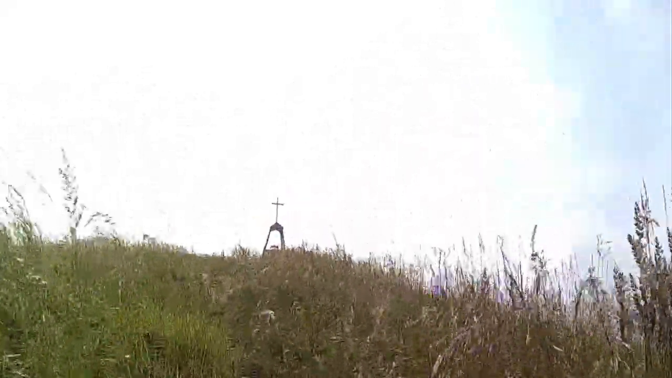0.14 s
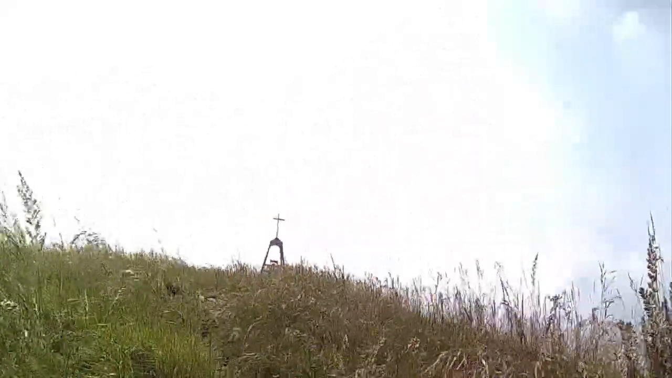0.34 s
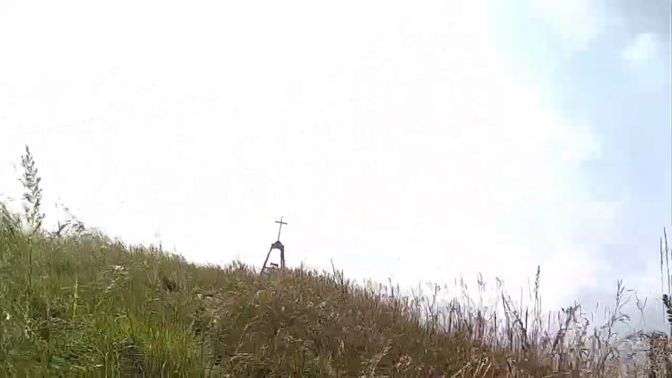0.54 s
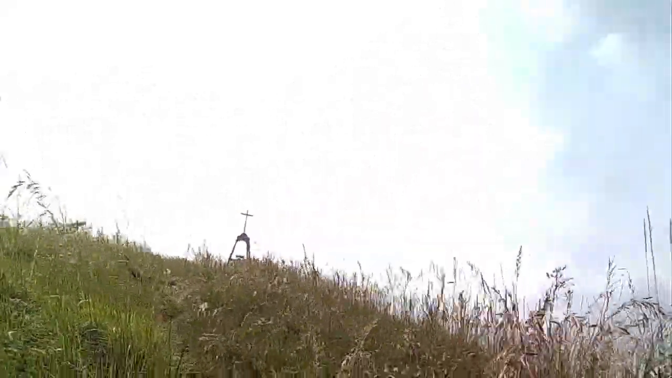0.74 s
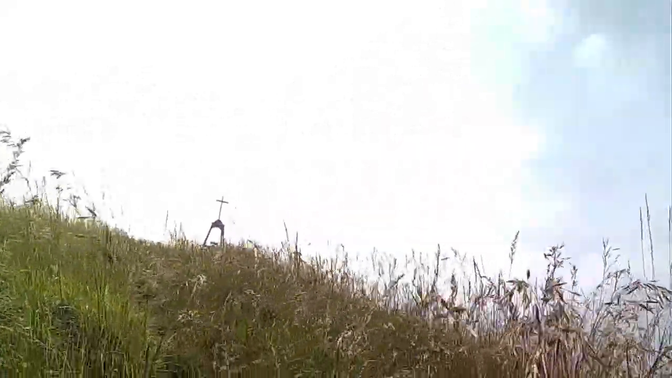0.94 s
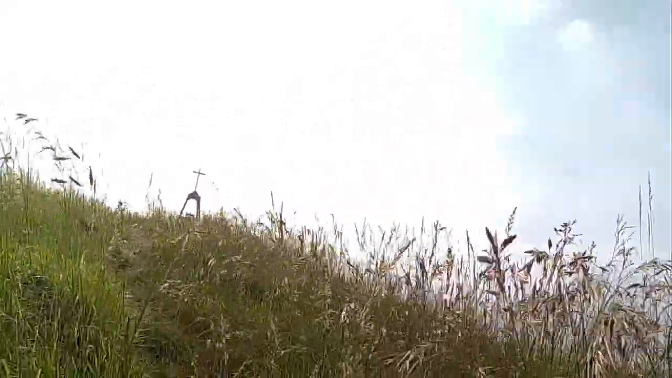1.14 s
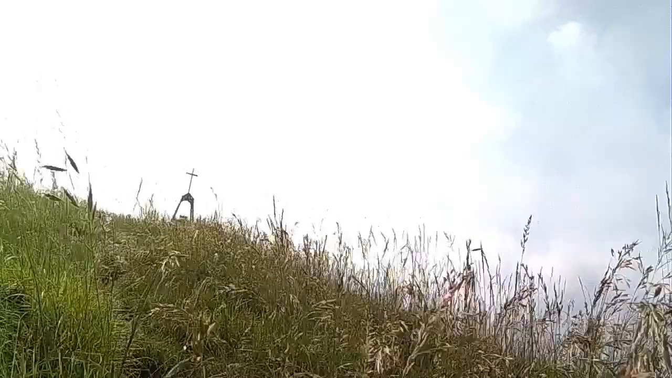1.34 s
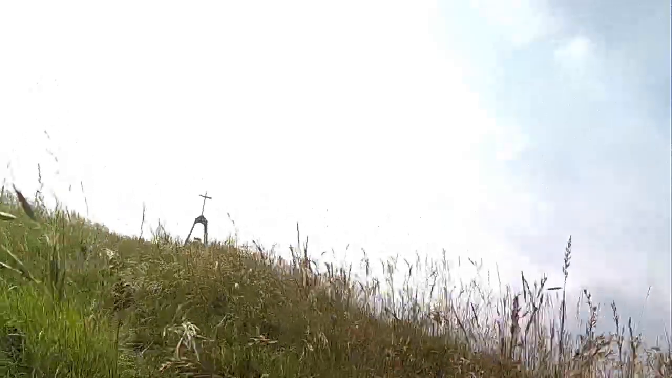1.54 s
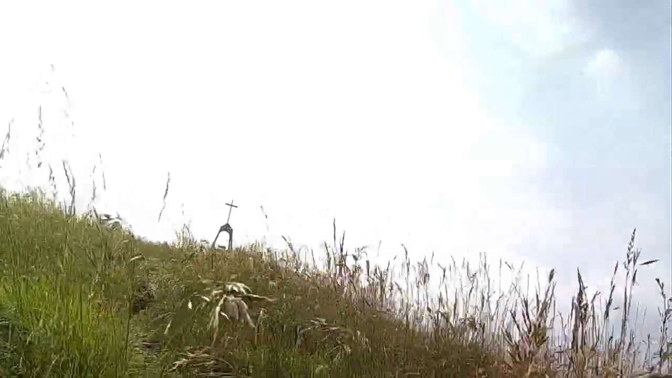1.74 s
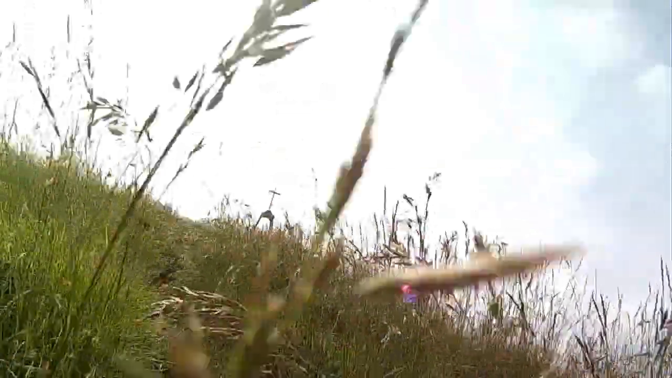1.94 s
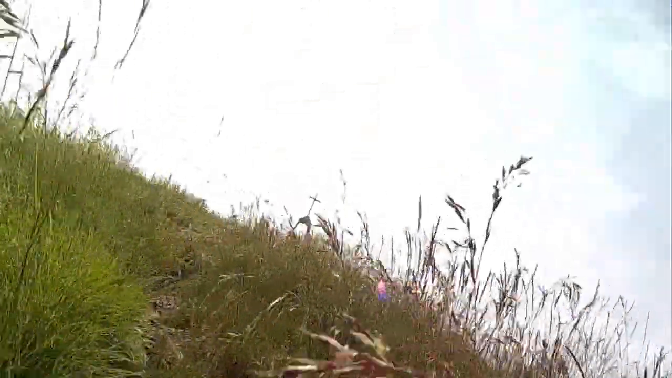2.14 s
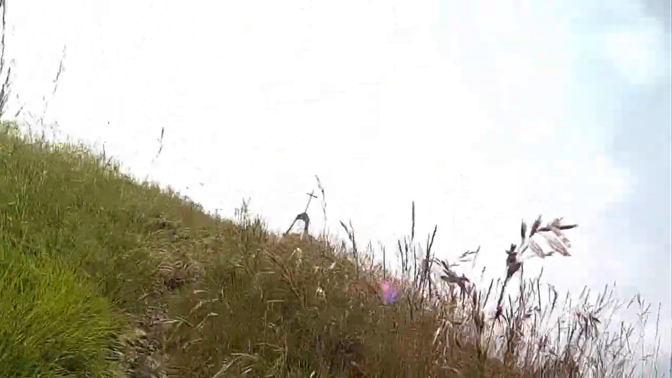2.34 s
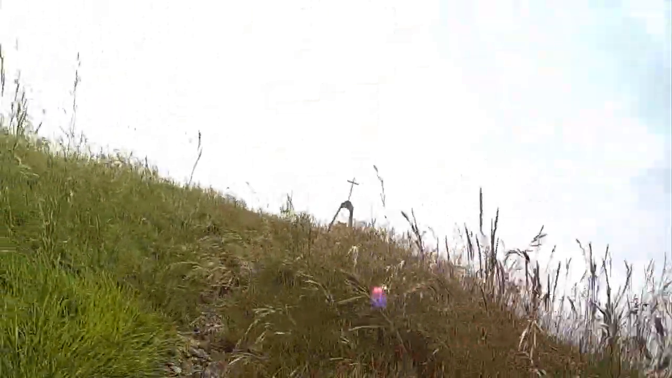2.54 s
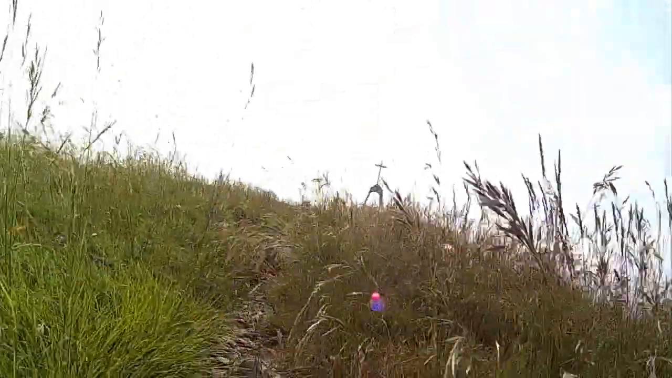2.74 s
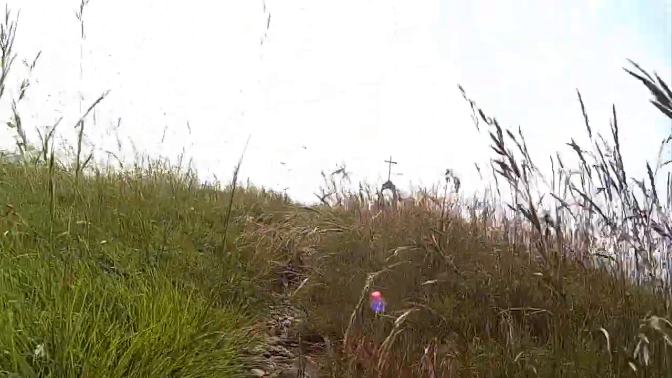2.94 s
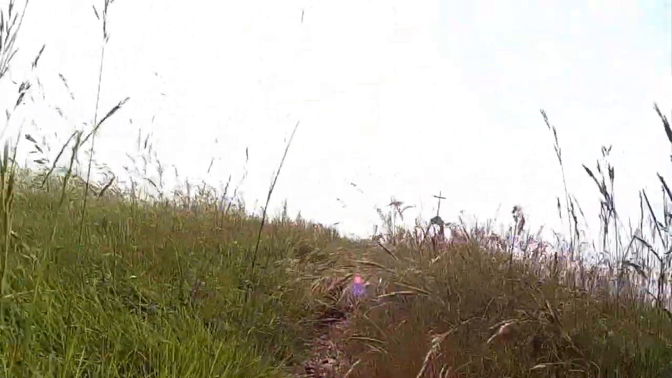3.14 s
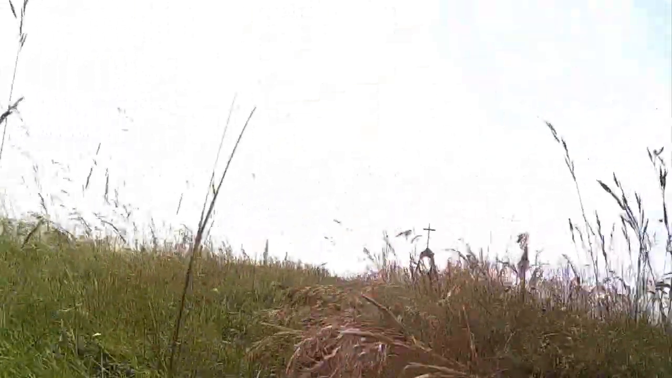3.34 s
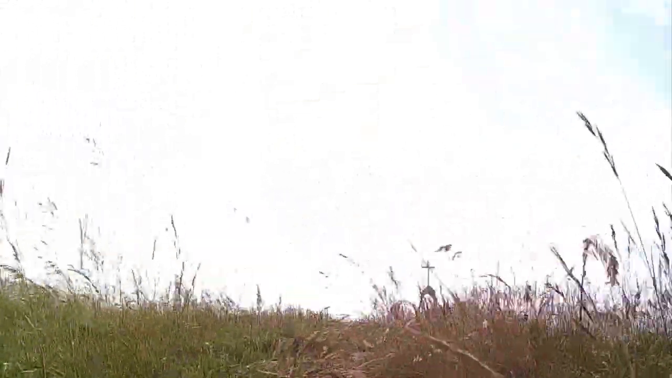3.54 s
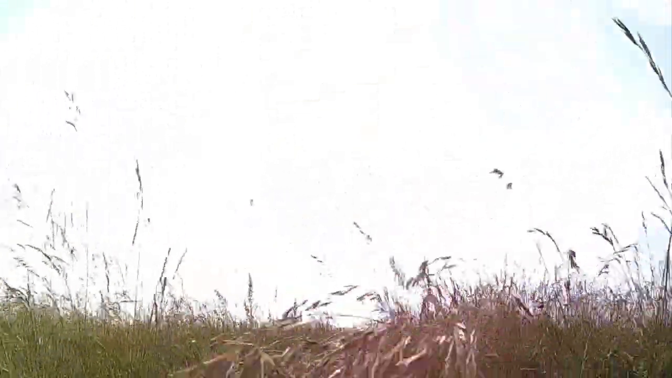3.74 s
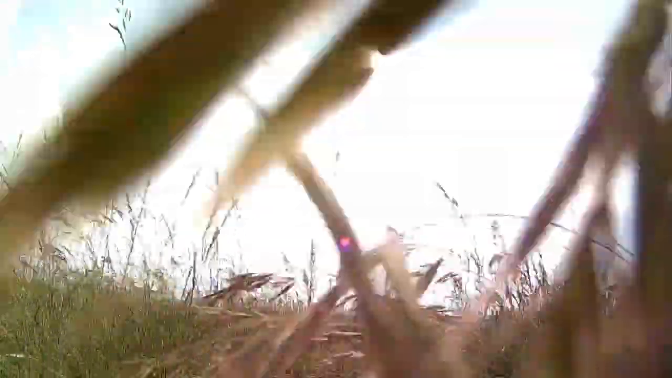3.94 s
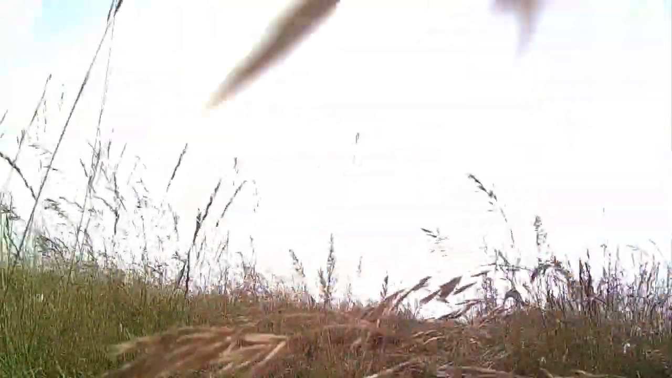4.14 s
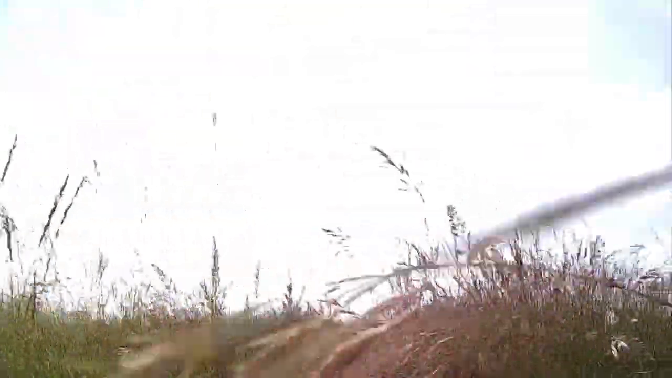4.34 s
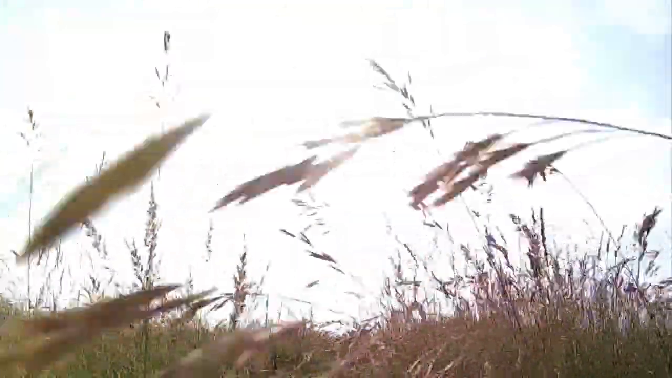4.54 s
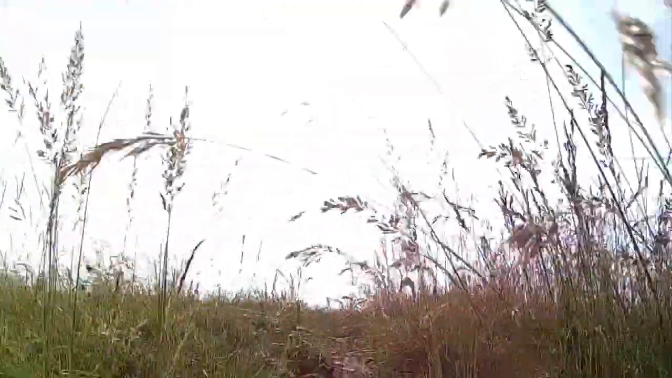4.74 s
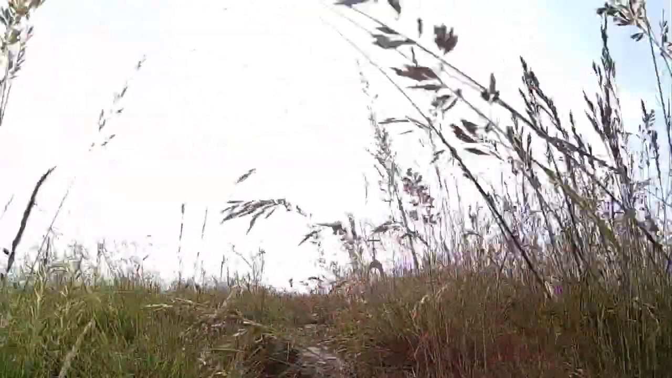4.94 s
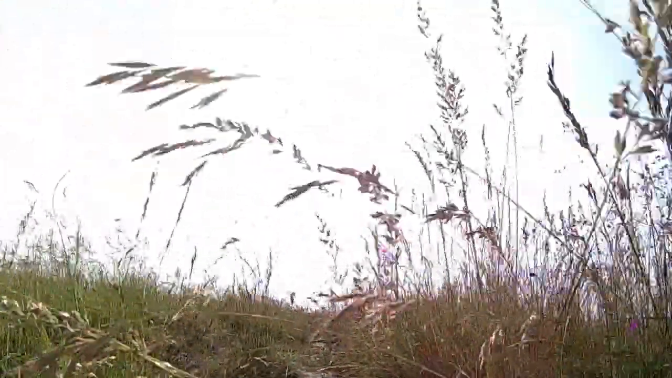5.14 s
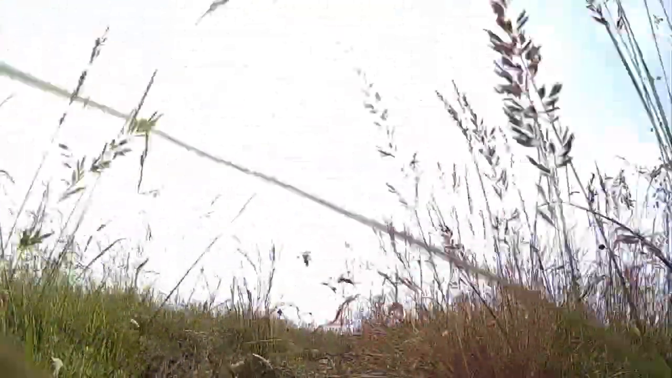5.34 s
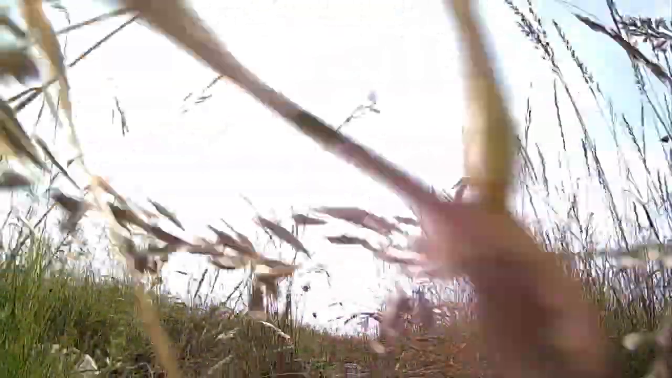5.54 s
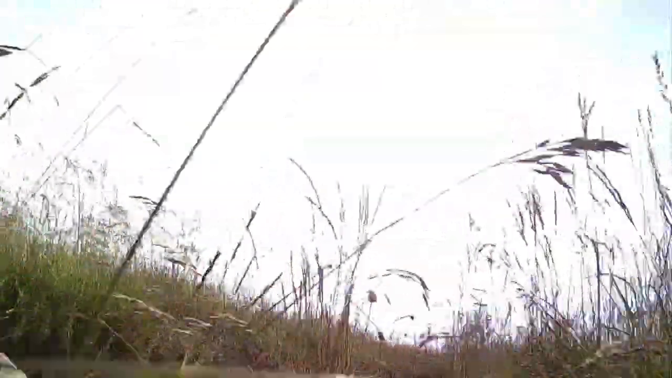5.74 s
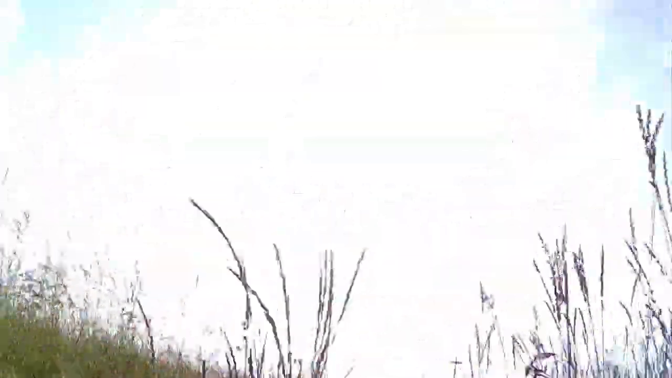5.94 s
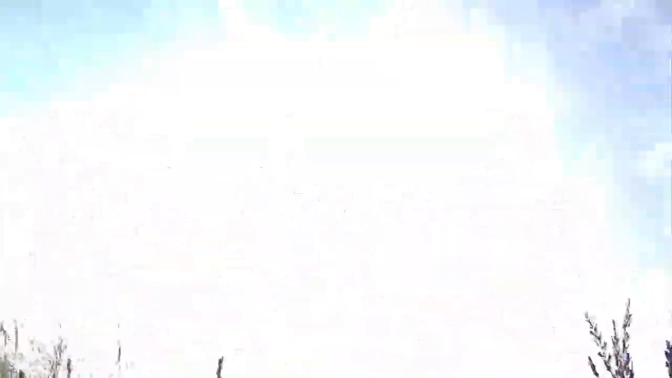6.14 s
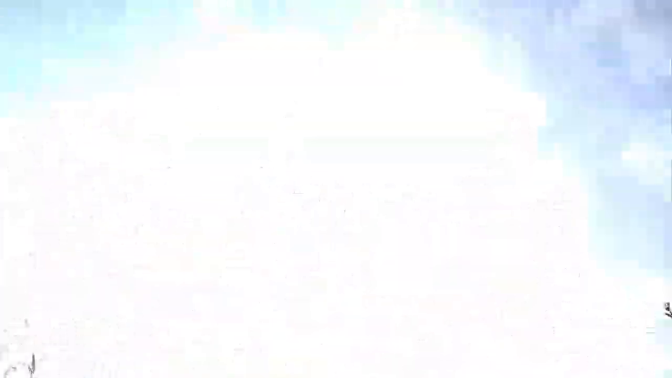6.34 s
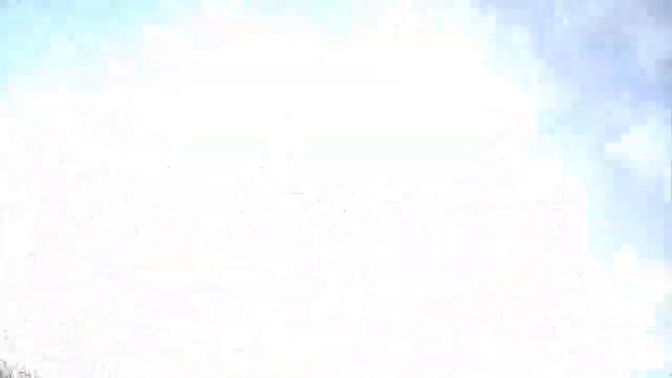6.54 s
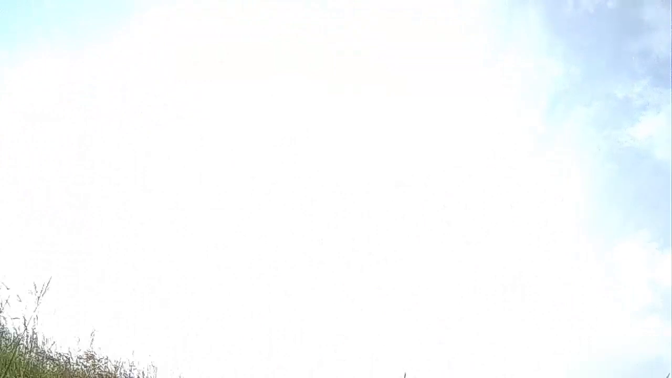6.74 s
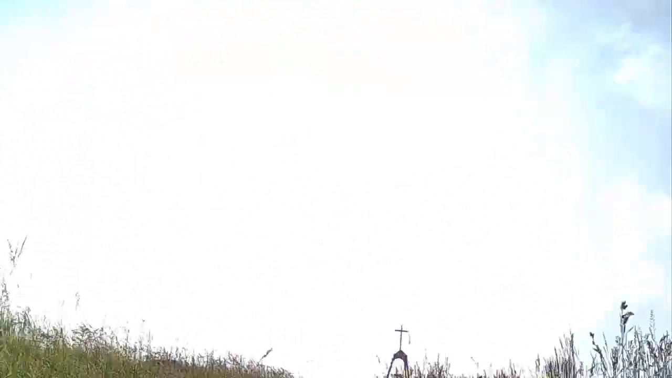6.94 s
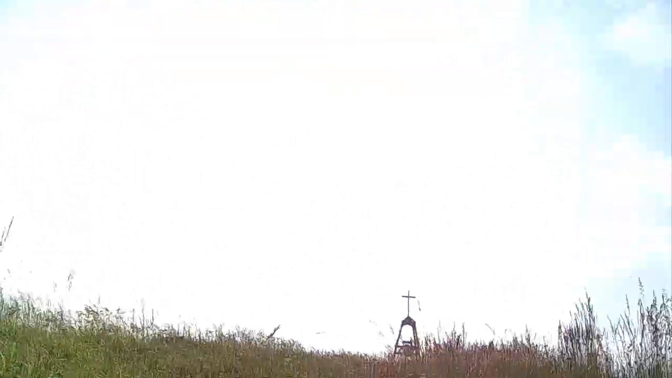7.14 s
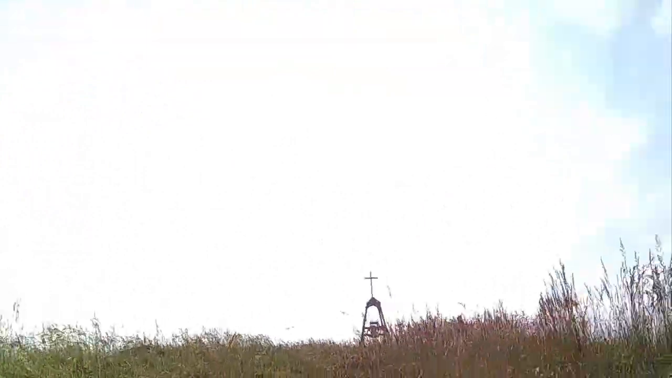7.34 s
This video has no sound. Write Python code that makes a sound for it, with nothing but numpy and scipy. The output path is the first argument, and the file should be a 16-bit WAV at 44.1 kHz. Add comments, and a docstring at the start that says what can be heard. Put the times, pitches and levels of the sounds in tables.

```python
"""Small camera through tall dry grass

Stalks and seed heads rub, tick and scrape on the plastic housing of a camera carried low, ringing its
short modes, and heavy stems thump the body. Air moving past the port rumbles and flutters.
Underneath, the electronics hiss, whine and blip faintly."""
import sys
import numpy as np
from scipy.fft import rfft, irfft, next_fast_len
from scipy.io import wavfile
from scipy.ndimage import map_coordinates

SR = 44100
rng = np.random.default_rng(int(sys.argv[2]) if len(sys.argv) > 2 else 0)


def int16_out(signal):
    """Quantize to a 16-bit WAV file."""
    q = np.round(np.clip(np.atleast_2d(signal).T, -1, 1) * 32767)
    wavfile.write(sys.argv[1], SR, q.astype(np.int16))


N = 325899

# resonances of the plastic housing: pitch_hz, width_hz, level_db
HOUSING_MODES = [(333, 40, -15.5), (549, 153, -15), (833, 134, -8.5), (1223, 112, 1.5), (1539, 179, 0.5),
                 (1872, 263, -7.5), (2005, 410, -7), (2340, 1460, -10.5), (3167, 170, -8),
                 (3682, 238, -9.5), (4107, 237, -6.5), (4770, 214, -9.5), (5530, 370, -14),
                 (6520, 2540, -14.5), (7760, 700, -9.5), (7990, 570, -18.5), (9880, 560, -16),
                 (11200, 3300, -32.5), (14600, 1100, -33.5)]
# heavy stems jolting the body: start_s, peak_db, pitch_hz, t60_s, direction
STEM_HITS = [(2.33, -23, 163, 0.023, 1), (3.11, -11, 54.57, 0.2, -1), (3.268, -25, 518, 0.037, 1),
             (3.31, -16, 94.1, 0.028, -1), (3.536, -21, 168, 0.075, 1), (3.737, -18, 67, 0.088, 1),
             (3.788, -16.5, 105.2, 0.052, 1), (4.011, -20, 61.3, 0.34, -1), (4.064, -24, 136, 0.04, -1),
             (4.295, -10, 63, 0.039, 1), (4.315, -18, 182.3, 0.18, -1), (4.361, -9.5, 129, 0.029, -1),
             (4.386, -26, 50.6, 0.062, 1), (4.819, -34, 49, 0.13, 1), (5.079, -21, 382, 0.035, 1),
             (5.326, -18, 137, 0.023, -1), (5.349, -23.5, 46.38, 0.11, 1), (6.353, -17.5, 207, 0.013, 1)]
SPLIT_HZ = 2000  # soft contacts ring the modes below, hard ones those above


def amp(db):
    return 10 ** (np.asarray(db) / 20)


def unit_rms(x):
    return x / np.sqrt(np.mean(x ** 2, axis=-1, keepdims=True) + 1e-20)


def fader(points):
    """Gain per sample through (time_s, level_db) points; silent outside them."""
    time_s, level_db = np.transpose(points)
    return amp(np.interp(np.arange(N) / SR, time_s, level_db, -120, -120))


def wobble(rate):
    """A smooth random curve, rate knots a second."""
    return map_coordinates(rng.standard_normal(int(N * rate / SR) + 4), [np.arange(N) * rate / SR])


def filtered(x, response):
    """Passes x through a complex frequency response."""
    n = x.shape[-1]
    padded = next_fast_len(n + 4096)
    return irfft(rfft(x, padded) * response(np.fft.rfftfreq(padded, 1 / SR)), padded)[..., :n]


def noise(spectrum):
    """Noise of rms 1 coloured by (frequency_hz, level_db) points."""
    hz, db = np.transpose(spectrum)
    colour = lambda f: amp(np.interp(np.log(f + 1), np.log(hz + 1), db, -120, -120))
    return unit_rms(filtered(rng.standard_normal(N), colour))


def lay_out(start_s, sounds):
    """A track with each sound laid at its start time."""
    track = np.zeros(N)
    for start, sound in zip(start_s, sounds):
        at = round(start * SR)
        track[at:][:len(sound)] += sound[:N - at]
    return track


def air():
    """Slow eddies rumble at the port; air, drags and thumps shake up a body flutter near 180 Hz."""
    # strength of the rumble: time_s, level_db
    gusts = [(0.0, -43.5), (0.64, -46.5), (1.48, -40.5), (1.77, -45.5), (2.3, -36.5), (2.8, -42.5),
             (4.49, -30.5), (5.06, -37), (5.43, -32), (5.68, -39), (6.05, -32), (6.57, -41.5),
             (6.85, -33.5), (7.39, -43.5)]
    # colour of the eddies: frequency_hz, density_db
    rumble_spectrum = [(12, -31.5), (22, -7.5), (41, -0.5), (58, -7), (85, -20), (130, -33), (200, -53)]
    # colour of the shaking body: frequency_hz, density_db
    flutter_spectrum = [(70, -30), (100, -4), (150, -0.5), (183, 3), (220, -2.5), (290, -17.5),
                        (345, -13.5), (430, -29.5), (600, -63)]
    air_send_db, drag_send_db, thump_send_db = -16, -11, -19.5  # into the flutter
    linger = 2.64  # flutter decay time over the thump's
    t = np.arange(N) / SR
    airflow = fader(gusts)
    jolts = sum((t > start) * amp(db + thump_send_db - 60 * np.abs(t - start) / (linger * t60))
                for start, db, _, t60, _ in STEM_HITS)
    shake = amp(air_send_db) * airflow + amp(drag_send_db) * drag_gains()[0] + jolts
    rumble = unit_rms(amp(0.67 * wobble(11)) * noise(rumble_spectrum))
    flutter = unit_rms(amp(2.7 * wobble(30)) * noise(flutter_spectrum))
    return airflow * rumble + shake * flutter


def electronics():
    """Preamp hiss, a faint comb of tones, and a blip on two of every three frames."""
    # colour of the preamp noise: frequency_hz, density_db
    hiss_spectrum = [(120, -35), (200, -4.5), (485, -6), (943, -9.5), (1200, -10.5), (1440, -12.5),
                     (3430, -15), (4530, -15), (4970, -16.5), (15300, -22.5), (16500, -36)]
    # tones of the whine: pitch_hz, rms_db
    whine_tones = [(9830, -91), (9906, -92), (9982, -86), (10020, -84), (10058, -91)]
    # fader on the blips: time_s, level_db
    blip_levels = [(0, -56), (1, -54), (3.3, -48), (3.8, -66.5), (7.39, -85)]
    hiss_db, frames_per_s = -57, 30 / 1.001
    t = np.arange(N) / SR
    whine = sum(amp(db) * np.sqrt(2) * np.sin(2 * np.pi * (hz * t + rng.random()))
                for hz, db in whine_tones)
    frame = np.arange(int(N / SR * frames_per_s))
    dip_db = -8 * np.isin(frame % 15, [5, 6])  # the blips duck once each half second
    strength = (frame % 3 != 1) * amp(dip_db + rng.normal(0, 1.5, len(frame)))
    blip_hz = 4460 + rng.normal(0, 60, (len(frame), 1))
    age = t[:500]
    blip = np.sin(2 * np.pi * blip_hz * age) * np.exp(-((age - .004) / 0.0021) ** 2)
    blips = lay_out(frame / frames_per_s + 0.0091, strength[:, None] * blip)
    return amp(hiss_db) * noise(hiss_spectrum) + whine + fader(blip_levels) * blips


def housing(group):
    """Responses, a row each, and count of one group of housing modes (0 low, 1 high, 2 top)."""
    hz, width, db = np.transpose(HOUSING_MODES)[..., None]
    inside = np.digitize(hz[:, 0], [SPLIT_HZ, 3 * SPLIT_HZ]) == group
    gain = amp(db) * (-1) ** np.arange(len(hz))[:, None]
    soft_hz = [2600, 5500, 30000][group]  # soft stalks roll off above the group

    def response(f):
        resonances = gain * 1j * f * width / (hz ** 2 - f * f + 1j * f * width)
        return resonances[inside] / (1 + 1j * f / soft_hz) ** 3
    return response, inside.sum()


def strokes(start_s, length_s, peak_at, layers_db):
    """Summed gain of strokes that swell, sag and lift off; a row for each layer."""
    fade_s, release_s = 0.0055, .018
    shape_db = [-40, -10, 0, -12, -40]  # fade-in, start, peak, end, lifted off
    t = np.arange(N) / SR
    total = np.zeros((len(layers_db), N))
    for start, length, peak, db in zip(start_s, length_s, peak_at, np.transpose(layers_db)):
        end = start + length
        knots = [start - fade_s, start, start + length * np.clip(peak, .02, .98), end, end + release_s]
        part = slice(max(round(knots[0] * SR), 0), round(knots[-1] * SR))
        total[:, part] += amp(db[:, None] + np.interp(t[part], knots, shape_db))
    return total


def drag_gains():
    """How hard the dragging stalks drive the low, high and top modes."""
    # stalks sliding along the housing: start_s, length_s, low_db, high_db, top_db, peak_at (0-1)
    drags = [(2.049, 0.049, -36, -44, -69, 0.07), (2.096, 0.033, -26.5, -43, -52, 0.6),
             (2.139, 0.064, -26.5, -43, -54, 0.63), (2.203, 0.034, -29, -31.5, -49, 0.3),
             (2.248, 0.077, -24, -31, -43, 0.58), (2.325, 0.069, -28, -31, -35.5, 0.55),
             (2.383, 0.1095, -29, -38.5, -47, 0.24), (3.107, 0.38, -31.5, -49.5, -65, 0.79),
             (3.514, 0.043, -35.5, -46, -70, .4), (3.732, 0.099, -38, -60, -76, 0.5),
             (3.848, 1.72, -43, -53.5, -83, 0.45), (3.876, 0.24, -25.5, -45.5, -60, 0.66),
             (4.064, 0.18, -28, -37, -52.5, 0), (4.25, 0.18, -25, -28, -41, 0.39),
             (4.402, 0.98, -52, -53.5, -63, 0.6), (4.446, 0.076, -32, -31, -41, 0.24),
             (4.548, .17, -45, -37.5, -47.5, 0.66), (4.723, 0.031, -32, -30.5, -37, 0.19),
             (4.809, 0.037, -21, -32.5, -47, 0.47), (4.862, 0.25, -26, -34, -39.5, 0.67),
             (5.128, 0.028, -35, -35, -38.5, .3), (5.183, 0.056, -30.5, -38.5, -51, 0.41),
             (5.245, 0.063, -34.5, -35.5, -51, 0.52), (5.324, 0.24, -38, -51, -59, 0.02),
             (5.591, 0.074, -33.5, -49, -72, 0.35), (5.674, 0.07, -40, -50, -70, 0.46),
             (5.737, 0.18, -23, -23, -33, 0.37), (5.875, 0.2, -20.5, -23.5, -30, 0.32),
             (6.028, 0.037, -16, -23, -32, 0.8), (6.073, 0.062, -26, -36, -57, 0.12),
             (6.1, 0.25, -41, -53, -69, 0.7), (6.162, 0.022, -23.5, -40, -53, 0.38),
             (6.2, 0.12, -29, -37.5, -44, 0), (6.303, 0.068, -18.5, -21.5, -35, 0.87),
             (6.371, 0.053, -30, -37.5, -48, 0.9), (6.642, 0.047, -51.5, -49, -61, 0.53)]
    start_s, length_s, *layers_db, peak_at = np.transpose(drags)
    return strokes(start_s, length_s, peak_at, layers_db)


def rubs_and_scrapes():
    """Stalks stick and slip on the housing: clumps of tiny uneven slips over a rubbing noise."""
    # light, muffled touches on the low modes: start_s, length_s, level_db, peak_at (0-1)
    light_rubs = [(0.225, 0.12, -57, 0.12), (.42, 0.037, -55.5, 0.57), (.65, 0.096, -55, 0.84),
                  (0.814, .11, -42, 0.9), (0.997, 0.07, -47, 0.68), (1.6, 0.15, -59, .6),
                  (1.872, 0.13, -60, 0.46), (2.5, 0.34, -50.5, 0.64), (2.88, 0.193, -52, 0.08),
                  (3.56, .13, -54, 0.83), (6.724, 0.37, -57.5, 0.03), (7.04, 0.38, -51.5, 0.35)]
    slips_per_s, rub_flicker_db = 2000, 2.2
    clumps = amp(1.05 * wobble(28) + 1.86 * wobble(70) + 1.6 * wobble(200))
    slipping = rng.random(N) < slips_per_s / SR
    slip_db = np.minimum(5 * rng.exponential(size=N), 14)
    slips = slipping * amp(slip_db) * rng.standard_normal(N)
    force = clumps * (unit_rms(slips) + 0.86 * rng.standard_normal(N))
    rings = []
    for group in range(3):
        response, count = housing(group)
        # the contact point moves, so each mode swells by itself, slowly and grain by grain
        wander = amp([2.4 * wobble(14) + 2.6 * wobble(55) for _ in range(count)])
        rings.append(unit_rms(np.sum(wander * filtered(force, response), axis=0)))
    scrapes = np.sum(drag_gains() * rings, axis=0)
    # low cut: a rub is too weak to move the heavy panels
    light_ring = filtered(rings[0], lambda hz: 1 / (1 + (1050 / (hz + 1)) ** 6))
    rub = unit_rms(amp(rub_flicker_db * wobble(30)) * light_ring)
    start_s, length_s, level_db, peak_at = np.transpose(light_rubs)
    return scrapes + strokes(start_s, length_s, peak_at, [level_db])[0] * rub


def crackle():
    """Small ticks fall by chance while a stalk drags; gives rows of start_s, low_db, high_db, top_db."""
    # crackle peak above the drag, for the low, high and top modes: boost_db
    over_drag_db = [
        [4.5],
        [7],
        [7],
    ]
    per_s, spread_db = 60, 3
    at = rng.random(round(per_s * N / SR)) * N
    drag_db = 20 * np.log10(drag_gains()[:, at.astype(int)] + 1e-6)
    peak_db = drag_db + over_drag_db + spread_db * rng.standard_normal((len(at), 3)).T
    return np.vstack([at / SR, peak_db])[:, drag_db[0] > -60]


def ticks():
    """Each contact is a few ms of rough force; where it lands decides which modes answer."""
    # clear stalk strikes, with a peak for each group of modes: start_s, low_db, high_db, top_db
    strikes = [(0.2298, -36.5, -61, -54), (0.356, -40, -38.5, -37.5), (0.8605, -27.5, -31, -56),
               (2.06, -19, -29, -43), (2.0946, -24, -43, -48), (2.1083, -14, -33, -41),
               (2.2037, -11.5, -10.5, -9.5), (2.214, -16, -15, -22), (2.2238, -19, -10.5, -23),
               (2.2795, -14.5, -12.5, -19), (2.2912, -17, -15, -17), (2.333, -13.5, -17.5, -29),
               (2.3905, -10.5, -17, -28), (2.4081, -10, -31, -25), (2.4186, -8.5, -12, -40),
               (2.4538, -13, -20.5, -35), (2.4702, -11.5, -23, -49), (3.1128, -20.5, -38, -58),
               (3.3113, -16.5, -43, -55), (3.3847, -16.5, -45, -60), (3.3952, -18, -47, -58),
               (3.5211, -12.5, -19, -31), (3.7344, -31, -37, -73), (3.7891, -20.5, -30.5, -49),
               (3.9277, -23, -20, -30.5), (3.97, -14, -2, -36), (4.006, -27, -14.5, -35),
               (4.0688, -18, -14, -36), (4.1407, -20, -13, -51), (4.162, -24, -17, -47),
               (4.2512, -15, -7.5, -36), (4.3194, -7.5, -1.5, -11), (4.3548, -10, -12, -44),
               (4.4143, -28, -28, -24), (4.5583, -26, -19.5, -26), (4.596, -20.5, -18, -32),
               (4.64, -35, -18.5, -54), (4.8066, -35, -27, -32), (4.9221, -14, -16, -21),
               (5.069, -12, -22, -31), (5.081, -11, -13, -26), (5.0993, -10.5, -21, -30),
               (5.2023, -24, -19, -33), (5.282, -20.5, -36, -27), (5.2938, -17, -18, -29),
               (5.4081, -20.5, -32, -54), (5.486, -12, -14, -37), (5.5328, -30, -29, -48),
               (5.6248, -22, -26.5, -42), (5.7353, -12, -8, -11), (5.7622, -11, -7.5, -12),
               (5.788, -15, -11, -21), (5.825, -14, -9, -15), (5.8899, -4.5, -2.5, -20),
               (5.9103, -9, -18, -26), (5.9981, -7, -12, -17.5), (6.0421, -5, -7, -17),
               (6.0508, 1.5, 0.5, -5.5), (6.0759, -14.5, -8.5, -19), (6.201, -9.5, -9, -20.5),
               (6.2101, -22, -17, -19.5), (6.238, -15, -16, -54), (6.3074, -19, 0, -16.5),
               (6.3169, -29, -5.5, -6.5), (6.3261, -9, -0.5, -13), (6.3413, -6, -13, -17),
               (6.3596, -2.5, -15, -37), (6.41, -14.5, -32, -35), (6.646, -40, -25.5, -35),
               (6.6881, -37.5, -22.5, -31)]
    usual_ms, scatter = 1.97, 0.69
    start_s, low_db, high_db, top_db = np.hstack([np.transpose(strikes), crackle()])
    contact_ms = usual_ms * np.exp(scatter * rng.standard_normal(len(start_s)))
    contact_ms[len(strikes):] *= 0.65  # crackle is shorter than a clear tick
    t = np.arange(1700) / SR
    rough = rng.standard_normal((len(start_s), len(t)))
    rough[:, :3] *= 3  # the first touch is a snap
    mode_gains = amp(rng.normal(0, 3.5, (len(start_s), len(HOUSING_MODES))))
    # a dull contact, weak in the top modes, also tilts down the modes above the split
    octaves = np.log2(np.transpose(HOUSING_MODES)[0] / SPLIT_HZ).clip(0, None)
    mode_gains *= amp(0.48 * (top_db - high_db + 12.5)[:, None] * octaves)
    sounds = 0
    for group, (db, share) in enumerate([(low_db, .8), (high_db, .75), (top_db, .6)]):
        decay_s = share * np.clip(contact_ms, .5, 30)[:, None] / 1000  # treble ends sooner
        force = rough * np.exp(-t / decay_s) * (1 - 0.6 * np.exp(-t / (0.12 * decay_s)))
        response, count = housing(group)
        ring = filtered(force, lambda f: mode_gains[:, :count] @ response(f))
        mode_gains = mode_gains[:, count:]
        sounds = sounds + amp(db)[:, None] * ring / np.abs(ring).max(axis=1, keepdims=True)
    return lay_out(start_s, sounds)


def thumps():
    """A heavy stem rocks the body in the hand: a few damped cycles that sink in pitch."""
    start_s, peak_db, pitch_hz, t60_s, direction = np.transpose(STEM_HITS)[..., None]
    t = np.arange(12000) / SR
    cycles = pitch_hz * (t + 0.001281 * (1 - np.exp(-t / 0.016)))  # starts 8% sharp
    attack = 1 - np.exp(-t * pitch_hz / 0.34)
    decay = amp(-60 * t / np.clip(t60_s, .02, .4))
    rocking = direction * np.sin(2 * np.pi * cycles) * attack * decay
    return lay_out(start_s[:, 0], amp(peak_db) * rocking / np.abs(rocking).max(axis=1, keepdims=True))


def scene():
    """Grass on the housing over a bed of air and electronics, in mono."""
    return (ticks() + rubs_and_scrapes() + thumps() + air() + electronics())[None]


def record(dry):
    """Loud knocks flatten near full scale; nothing is kept above the band limit."""
    ceiling, band_limit_hz = .95, 16400
    clipped = dry / (1 + np.abs(dry / ceiling) ** 8) ** (1 / 8)
    return filtered(clipped, lambda hz: hz < band_limit_hz)


dry = scene()
out = record(dry)
int16_out(out)
```